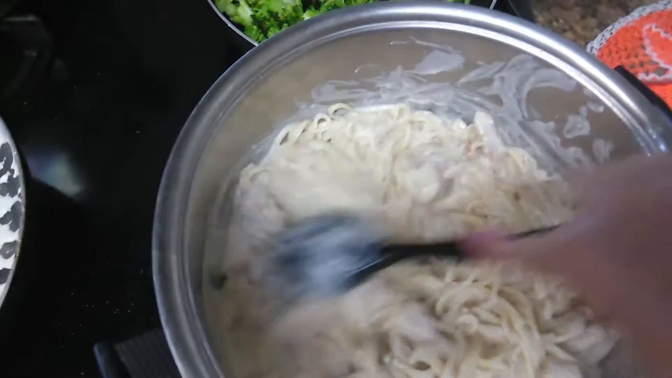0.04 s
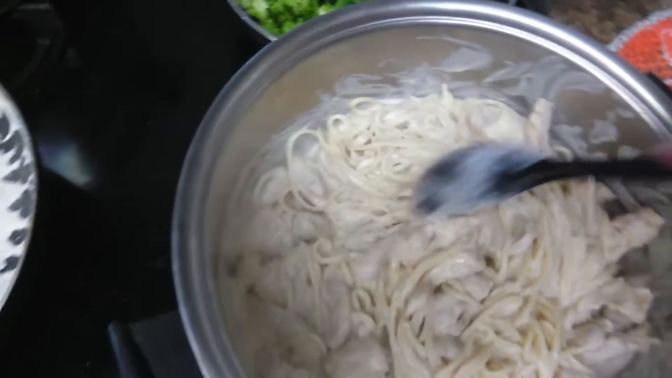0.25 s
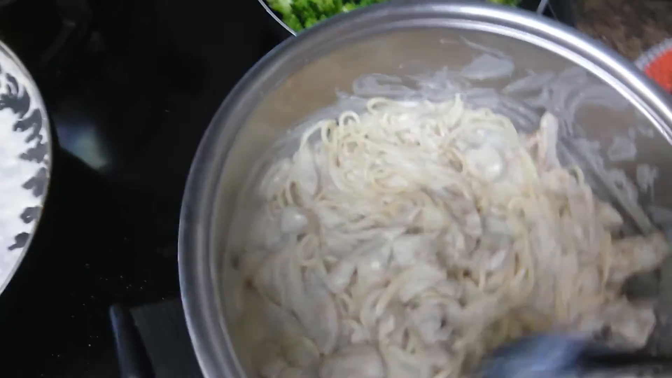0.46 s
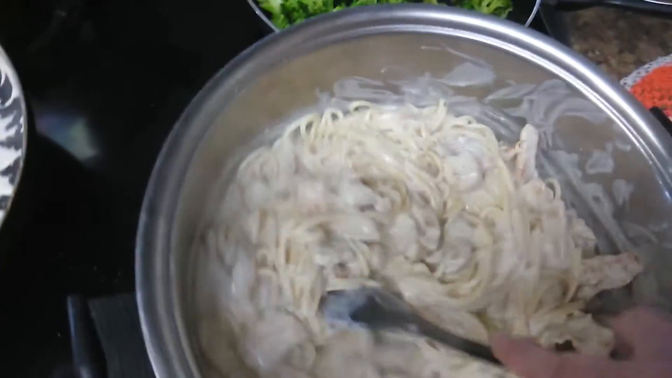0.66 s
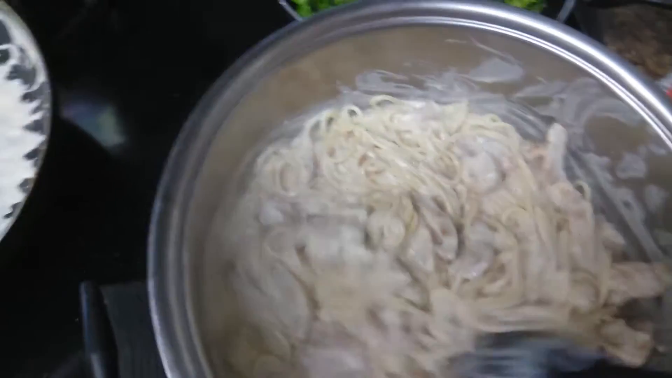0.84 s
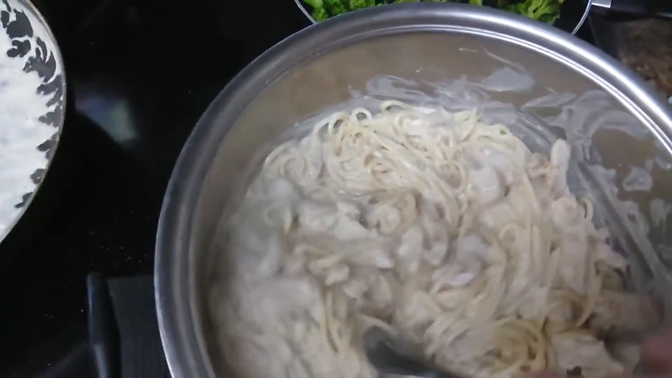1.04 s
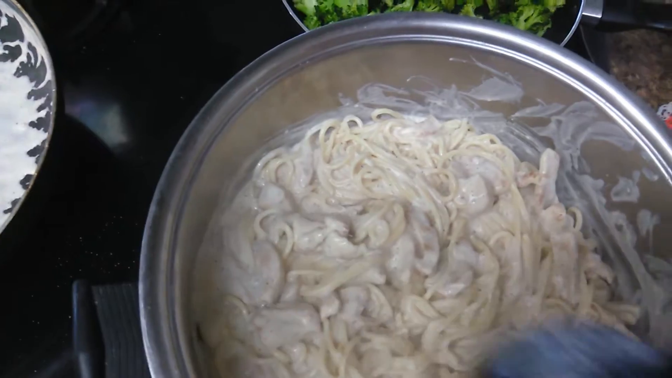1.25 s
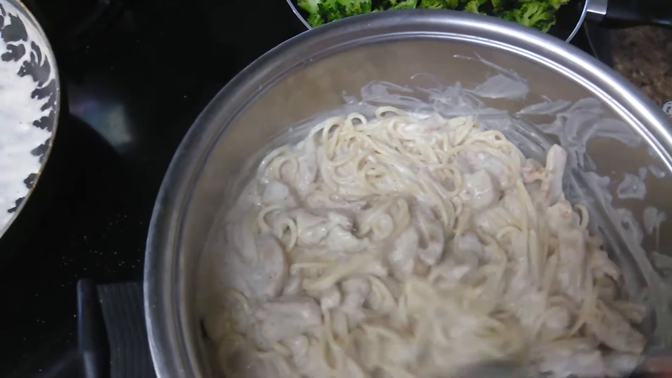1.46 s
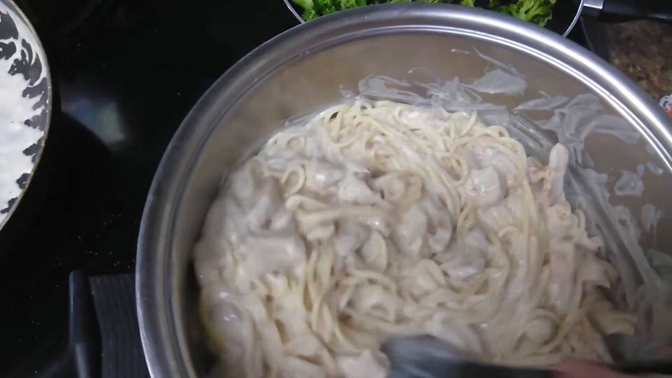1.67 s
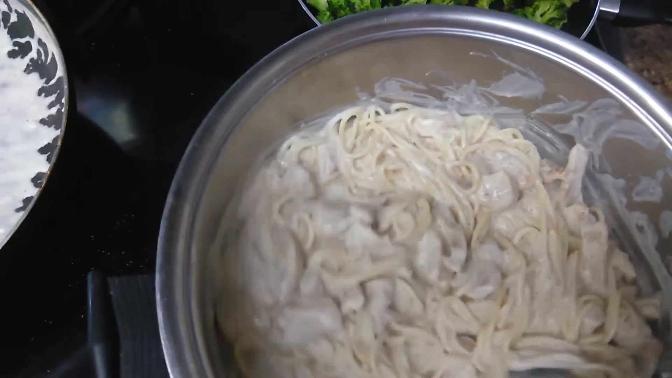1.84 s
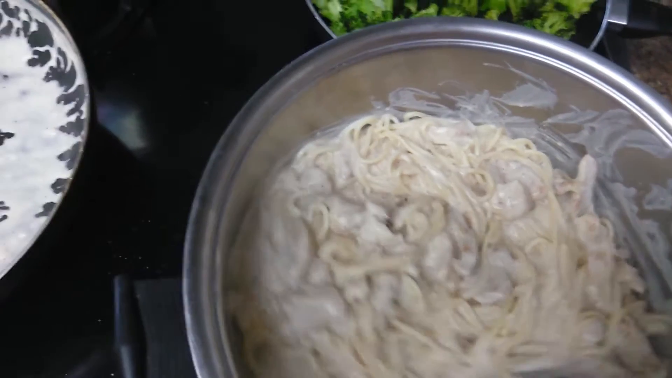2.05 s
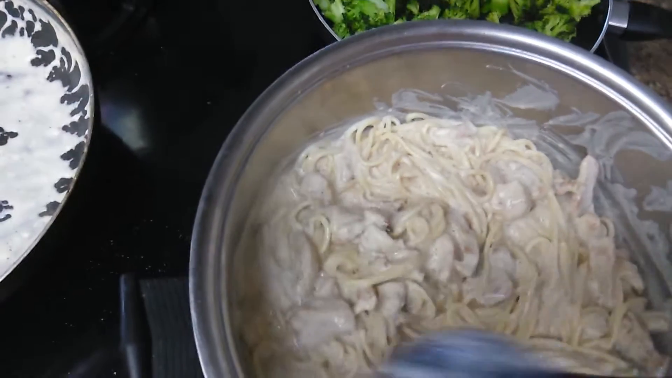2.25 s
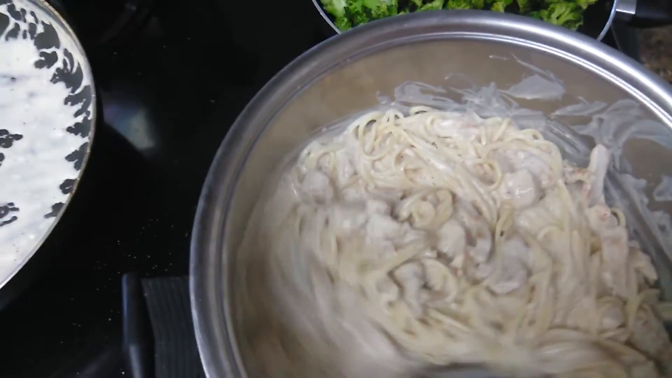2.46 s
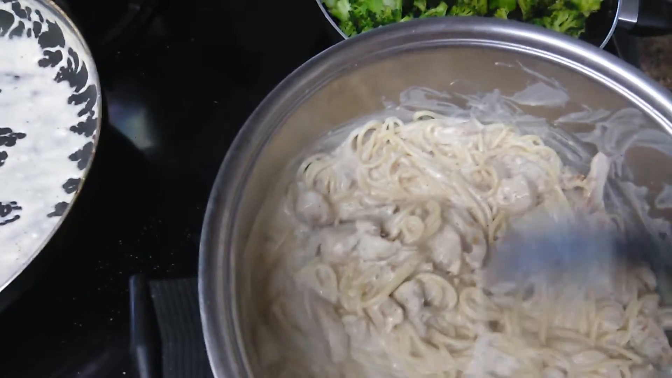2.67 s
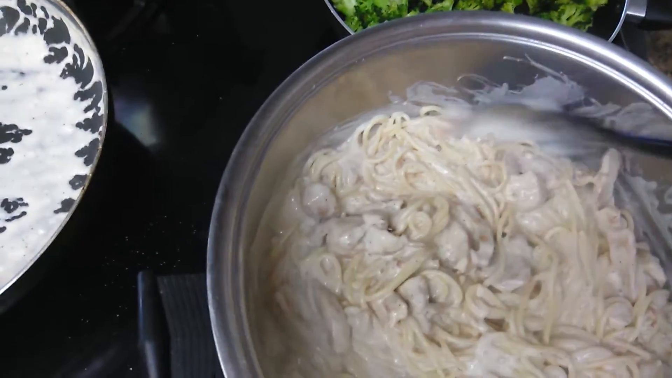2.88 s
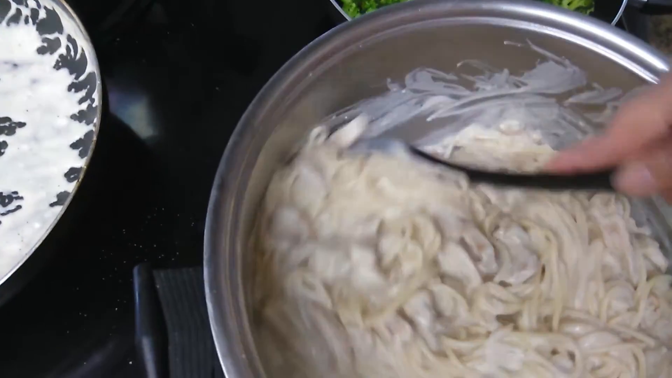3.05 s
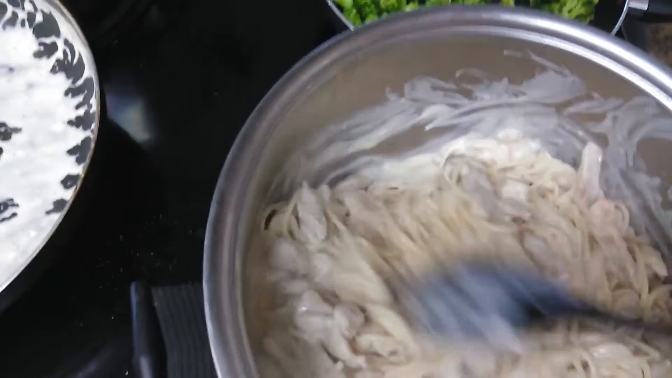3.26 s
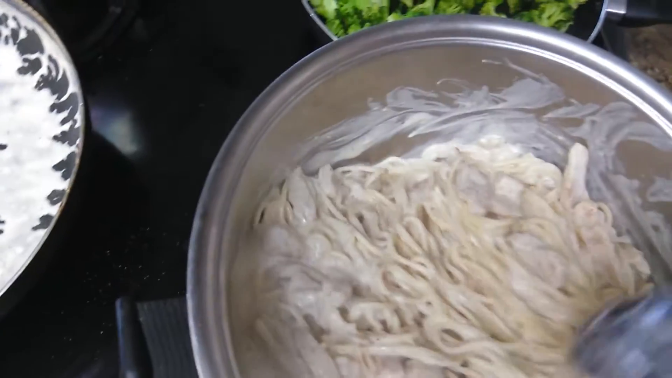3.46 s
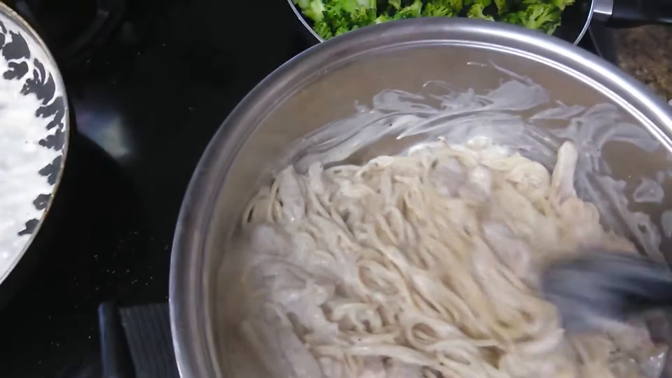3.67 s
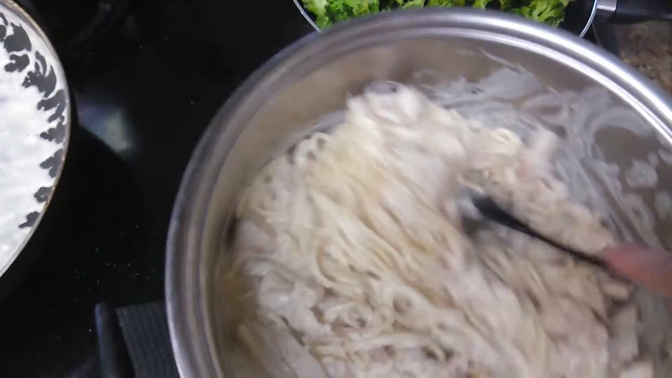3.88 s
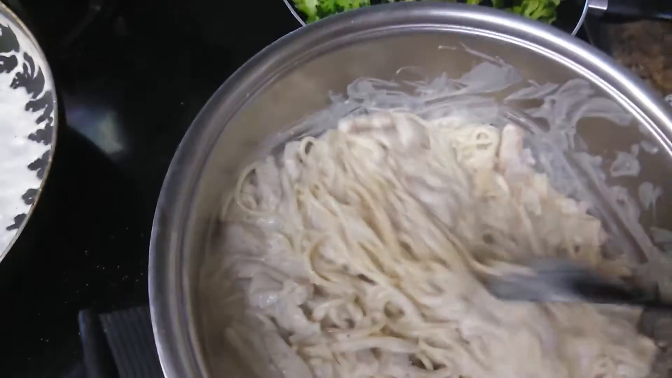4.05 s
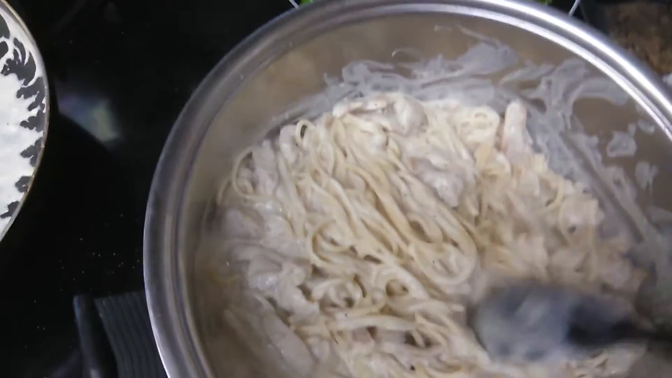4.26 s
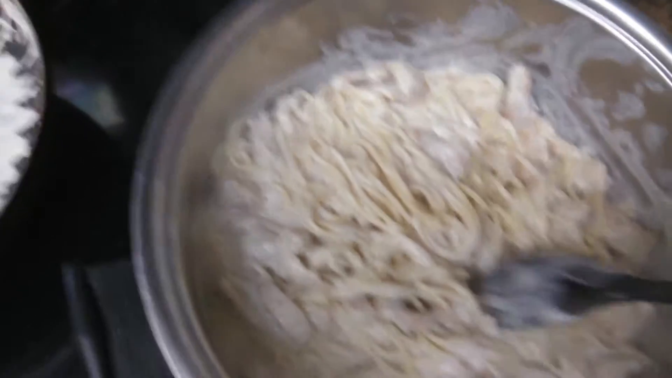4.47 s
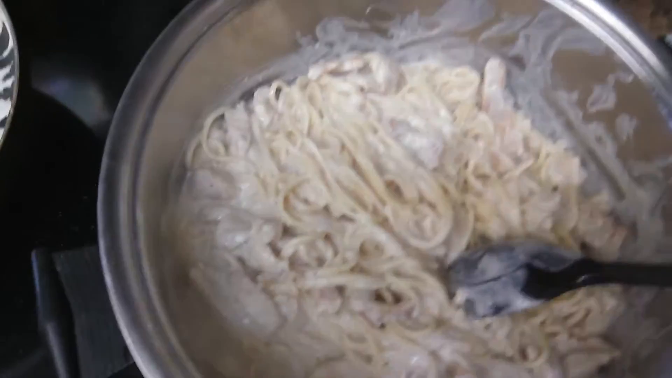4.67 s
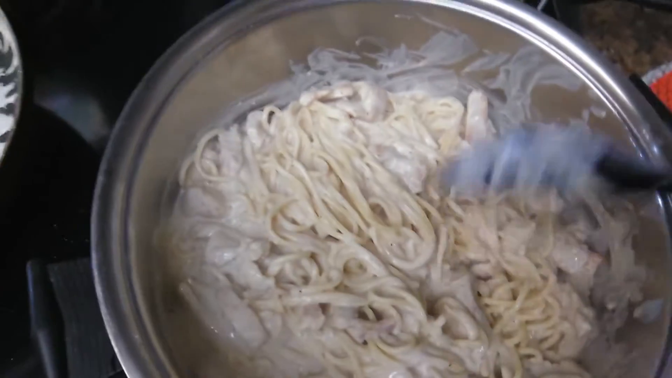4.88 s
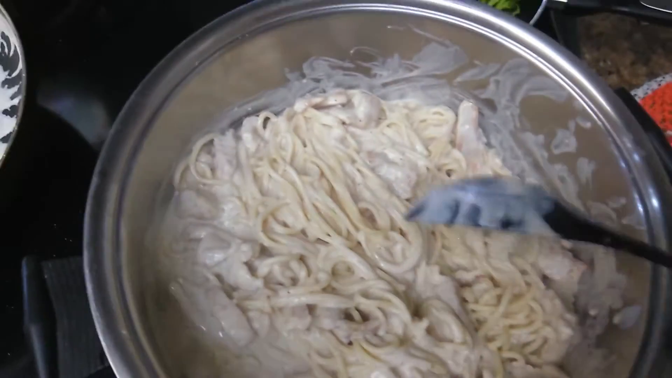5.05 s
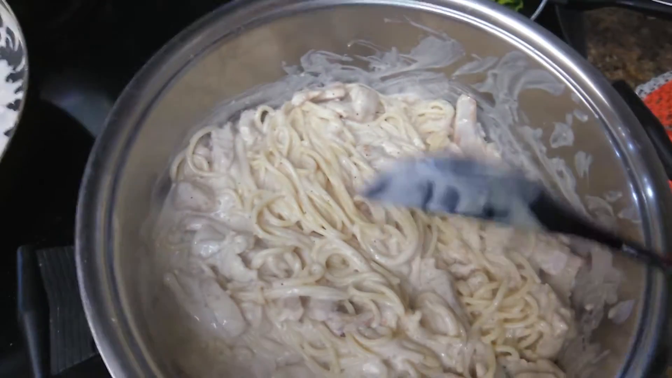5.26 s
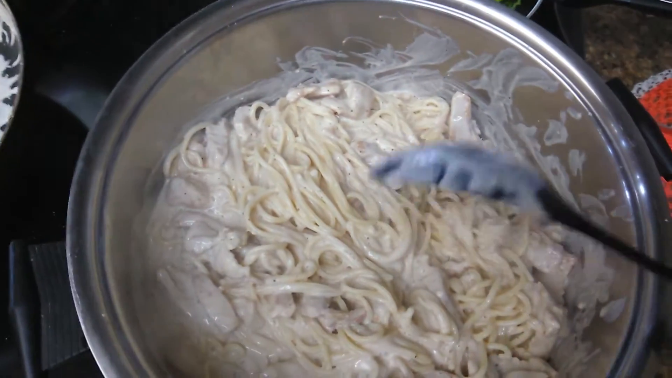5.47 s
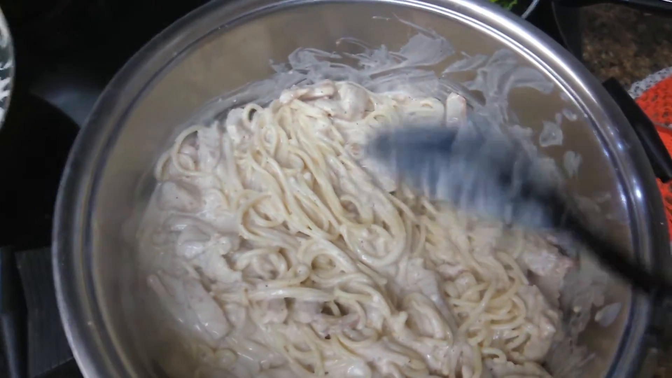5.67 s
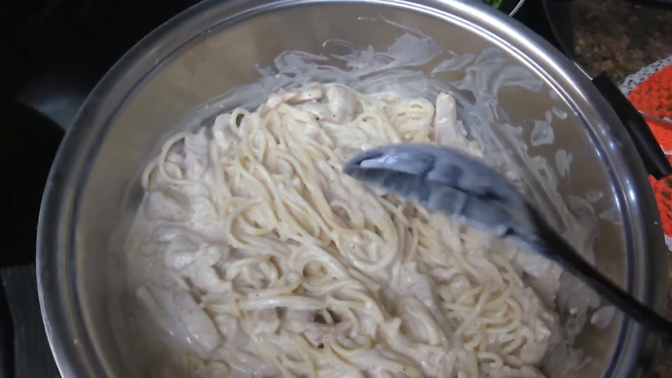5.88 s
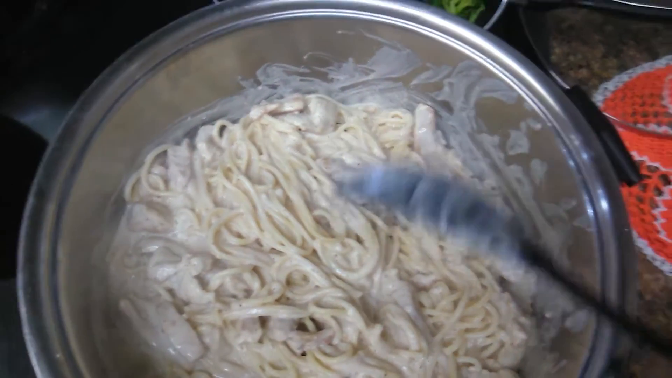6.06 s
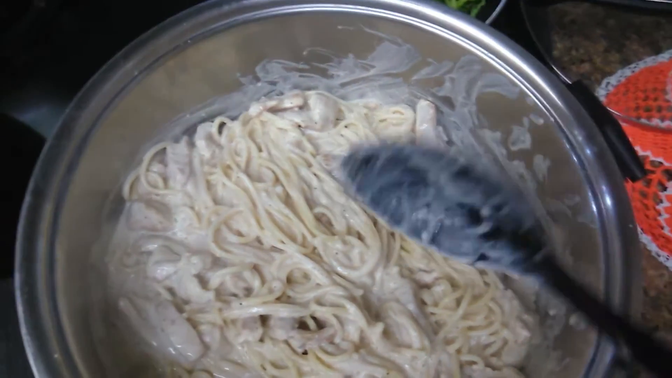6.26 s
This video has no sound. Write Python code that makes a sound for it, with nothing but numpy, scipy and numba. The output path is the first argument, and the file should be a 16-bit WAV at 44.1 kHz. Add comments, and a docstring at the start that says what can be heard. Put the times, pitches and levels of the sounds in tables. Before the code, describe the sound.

Close above a pot in a small, hard-surfaced kitchen, with faint low appliance hum throughout. From 0 to 1.2 seconds a spoon shoves through pasta in thick cream sauce: irregular wet crackle, sticky snaps and tiny popping air pockets. A short lull, then stronger squelches from about 1.45 to 2.15, with the sharpest wet snaps near 1.5 and 2.1. Softer smearing follows until a hard, fairly dull knock on the pot at 2.9, with small clunks and low rumble. Wet stirring resumes from 3.0 to 4.3, lighter and uneven. At 4.35 the spoon raps the steel rim, with weaker taps at 4.55 and 4.75. From 5.05 to the end at about 6.3, seven loud raps come steadily, roughly every 0.2 seconds: bright clattering cracks, short metallic rings damped by the food, deep thumps and brief room echoes.

```python
"""In a small hard kitchen with appliance hum, a plastic spoon turns pasta in thick cream sauce in a steel pot.
The spoon is then rapped on the rim to shake it clean. Bursting air pockets, short gliding sines over wet noise,
make the sauce crackle, snap and pop. Each rap is a noisy crack plus fading sines of spoon, rim and filled pot.
Dull clunks, thumps and a deep rumble follow raps; decaying noise gives the echoes.
A phone held above hears it through two ports of opposite polarity and different colour."""
import sys
import numpy as np
from scipy import signal
from scipy.fft import rfft, irfft, next_fast_len
from scipy.io import wavfile
from scipy.ndimage import uniform_filter1d
from numba import njit

SR = 44100
rng = np.random.default_rng(int(sys.argv[2]) if len(sys.argv) > 2 else 0)


def generate_wav(sig):
    """Save sig (samples, or channels by samples) to the path in sys.argv[1] as 16-bit PCM at SR."""
    pcm = np.round(np.clip(np.atleast_2d(sig).T, -1, 1) * 32767).astype(np.int16)
    wavfile.write(sys.argv[1], SR, pcm)


N = 278697
FAST = next_fast_len(N, True)  # a length that transforms quickly

# Levels are relative, and come before the room and the colour of the ports.
# appliance and air noise: f/Hz, level/dB
HUM_COLOUR = [(18, -57), (30, -20), (60, -1.5), (142, -2), (163, -2.5), (314, -5.5), (443, -11),
              (533, -9.5), (713, -5.5), (814, -11), (1000, -14), (2100, -63.5), (10800, -35.5),
              (16500, -89)]
# how alike left and right noise are: f/Hz, likeness/0-1
LEFT_RIGHT_LIKENESS = [(40, 0.99), (80, 0.73), (200, 0.9), (800, 0.65), (1300, 0), (16000, 0.37)]
HUM_DB = -48
# how long the room echoes: f/Hz, time to fall 60 dB (t60)/s
ROOM_DECAY = [(100, 0.58), (260, 0.7), (700, 1), (1800, 0.61), (4800, 0.51), (9000, 0.47), (12500, 0.32),
              (15000, 0.38)]
# colour of the two phone ports: f/Hz, left minus right level/dB
PORT_COLOUR = [(60, 1.5), (250, 3), (800, 2.5), (1500, 0.5), (4400, -1.5), (7500, -4.5), (9500, 8),
               (12000, 22), (14000, 17.5), (16000, 2)]
TOP_HZ = 16300
CEILING, KNEE = .74, 4  # loudest sample value let through; how sharply loud sound is rounded

# shudder after a blow: f/Hz, level/dB
RUMBLE_COLOUR = [(15, -14), (30, -3.5), (70, 7), (120, -1), (220, -24.5)]
RUMBLE_DB, RUMBLE_S, RUMBLE_ALIKE = -45, 0.035, 0.22  # against the blow; time to its peak; likeness 0-1
# low thumps after a rap, as the jolted pot drops back on the hob: t/s, level/dB
POT_DROPS = [(5.069, -39), (5.467, -27.5), (5.663, -30), (5.853, -38), (6.081, -28)]
# tones of such a thump: f/Hz, level/dB, t60/s
HOB_MODES = [(149.6, 2.5, 0.16), (230, 1.5, 0.075)]
# dull clunks of the pot wall as the heavy food slaps back after a blow: t/s, level/dB, f/Hz
FOOD_SLAPS = [(2.886, -21, 682), (2.94, -27, 660), (3.05, -35, 946), (5.075, -33, 1084), (5.475, -28, 654),
              (5.638, -33, 720), (5.866, -30, 680), (6.262, -33, 740)]
CLUNK_T60_S, CLUNK_SPREAD = 0.076, 0.18  # pitch spread is in log units, up and down

# pushes of the spoon: start t/s, swell time/s, hold time/s, crackle level/dB,
# extra level of large air pockets/dB, extra level of fine ones/dB
SPOON_PUSHES = [(-0.001, 0.12, 0.014, -41, 14, 9), (0.095, 0.018, 0.14, -45.5, -24, -2),
                (0.337, 0.025, 0.055, -52, 0, 8), (0.5, 0.012, 0.21, -45.5, 5, 2.5),
                (0.747, 0.062, 0.12, -45.5, 10, 3), (0.986, 0.0083, 0.029, -40, 10.5, 6),
                (1.117, 0.02, 0.067, -45.5, 9, 1.5), (1.466, 0.014, 0.015, -57, 6, 6),
                (1.531, 0.011, 0.051, -36, 9, 2), (1.681, 0.067, 0.038, -36.5, 10.5, 1.5),
                (1.911, 0.026, 0.024, -43, 9.5, -0.5), (2.048, 0.024, 0.0069, -41.5, 5.5, -1.5),
                (2.365, 0.043, 0.17, -47.5, -3.5, 5.5), (2.95, 0.074, 0.024, -39, 8, 4.5),
                (3.159, 0.014, 0.3, -46, 9, 4.5), (3.644, 0.0061, 0.11, -48.5, 11.5, 3.5),
                (3.751, 0.037, 0.27, -42.5, 8.5, 1.5), (4.156, 0.009, 0.013, -58, 5, 23),
                (4.305, 0.041, 0.012, -35, 13.5, -1), (4.494, 0.021, 0.017, -43.5, -15, 3),
                (4.785, 0.019, 0.085, -58, 2, 10.5)]
START_DB, SETTLE_DB_PER_S = -32.5, 129  # a push swells from this far below its level, then falls quiet
# sound of bursting sauce: f/Hz, level/dB
SAUCE_COLOUR = [(650, -11.5), (1100, -9), (1250, -11), (2400, -6.5), (3960, -2), (9050, -5.5), (11200, -7),
                (14900, -22), (15900, -16.5), (16500, -38)]
LARGE_HZ, FINE_HZ = 2260, 7960  # large pockets sound below the first, fine ones above the second
PATCH_DB, PATCH_PER_S = 3.5, 25  # each half octave of the crackle swells and sinks on its own
# sauce tearing: t/s, level/dB, f/Hz, left minus right level/dB
TEARS = [(0.068, -22.5, 4460, -17), (0.119, -30, 3540, -8), (0.132, -22.5, 10800, -10),
         (0.164, -26, 3600, 1), (0.189, -31, 7320, -13), (0.2662, -28, 11400, -18), (0.325, -27, 5470, -16),
         (0.342, -23.5, 2700, 5), (0.416, -35, 8400, -4), (0.439, -38.5, 11200, 9),
         (0.511, -35.5, 13400, 36), (0.522, -25, 6660, -19.5), (0.529, -28, 10900, 4),
         (0.556, -34, 6500, -6), (0.596, -25, 9500, -6), (0.612, -23.5, 7400, -6), (0.706, -36, 8000, -21),
         (0.772, -34, 5500, -5), (0.793, -22.5, 4370, -12), (0.823, -26, 10400, 9), (0.843, -27, 11700, -3),
         (0.8647, -19.5, 11000, 1), (0.904, -33, 3300, -5), (0.932, -33, 1510, -16),
         (0.998, -22.5, 3600, -6), (1.011, -34.5, 4140, -25), (1.023, -35, 1040, -19),
         (1.1496, -29, 6300, -16), (1.1778, -29, 1260, -7.5), (1.1844, -26, 1600, 1),
         (1.4471, -48, 11100, 52), (1.464, -13.5, 11500, -4), (1.474, -16.5, 1610, 0),
         (1.516, -15.5, 5440, 3), (1.53, -13, 3480, -5), (1.564, -22.5, 3420, -1), (1.604, -27, 4940, -17),
         (1.6243, -25.5, 4270, -10), (1.722, -24, 1266, -7.5), (1.748, -31, 1400, -19),
         (1.796, -20, 3860, -4), (1.843, -23, 4130, 1), (1.876, -37, 2650, -18), (1.913, -24, 10000, 0),
         (1.932, -19.5, 1590, -11), (1.942, -19.5, 10100, 9.5), (1.964, -24.5, 1540, -5),
         (2.059, -31, 5400, 0), (2.063, -28.5, 1340, -2), (2.0803, -18.5, 1480, -7),
         (2.0875, -9.5, 4650, 0), (2.1146, -11.5, 4750, -0.5), (2.161, -44, 5600, 1), (2.25, -47, 5400, -3),
         (2.261, -39, 2000, -5), (2.303, -42, 7640, -11), (2.447, -33, 4800, -20), (2.509, -27, 10800, 7),
         (2.5463, -35, 7200, -17), (2.5594, -30, 2920, 6), (2.6717, -33.5, 6400, -21),
         (2.9996, -29, 3600, -8.5), (3.0235, -17.5, 4140, -1), (3.038, -23, 6800, -1),
         (3.049, -18, 5700, 0), (3.0703, -24, 2770, 8), (3.106, -31.5, 6130, -14), (3.119, -29.5, 7000, -1),
         (3.1908, -35.5, 2700, -10), (3.219, -32.5, 10800, 10), (3.3306, -36, 5140, -22),
         (3.369, -35.5, 11900, -29), (3.422, -24.5, 5300, -1), (3.664, -37, 4600, -7),
         (3.717, -29.5, 1145, -7.5), (3.743, -24.5, 7700, -24.5), (3.8052, -31, 6060, -22.5),
         (3.817, -41, 3580, -6), (3.846, -30.5, 4030, -12), (3.8678, -33.5, 5600, -4.5),
         (3.955, -26, 6300, -12), (4.011, -22, 3600, -1.5), (4.076, -33, 6340, 6.5),
         (4.302, -33, 11160, 11), (4.183, -36, 6200, -26.5), (4.312, -36.5, 2547, -6),
         (4.334, -19.5, 3130, -10.5), (4.345, -31, 3960, -6), (4.94, -48, 5000, -10)]
TEAR_MS = 4.5  # the small pockets of a tear are spread over this time
# crackle round a tear, against its level; how fast it builds before and dies after
SPLASH_DB, BUILD_DB_PER_S, SPLASH_DB_PER_S = -13.5, 1497, 1408
POP_HZ, POP_DB = 1800, -6  # a tear below this pitch is mostly one big pocket; level change of that pocket
POP_CYCLES, POP_VOLLEY_DB = 17, -7  # cycles the big pocket rings; its volley is weaker

# spoon on steel: t/s, blow level/dB, ring level/dB, longest rim mode level/dB, thud level/dB,
# side wall level/dB, spoon clack f/Hz, clack level/dB, brightness/dB per octave,
# middle of the crack level/dB, left minus right level/dB, chatter time/ms
RAPS = [(2.8719, -8, -21, -36, 9.5, 10, 1050, 14, -5.5, 4.5, -1, 7.3),
        (4.3605, -7.5, 1, -0.5, 4.5, 5.5, 1550, 10, -2, -2.5, 1.5, 10.2),
        (4.57, -17.5, -1, -5, 4.5, 5, 1600, 15.5, -3, -4.5, -7, 7.7),
        (4.7273, -25, -4.5, 1.5, 3, -3, 1510, 17.5, -4, -3, -10, 7.9),
        (5.0532, -3.5, -4, 6.5, 6.5, -5, 1480, 15, -2.5, -7, -0.5, 5.5),
        (5.2555, -5, -3.5, 3.5, 6.5, 3.5, 1055, 10, -1.5, -3.5, 0, 7.2),
        (5.451, -4.5, -5.5, 0, 3, 1, 1125, 8.5, -1.5, -3, -0.5, 7.3),
        (5.6197, -2.5, -4.5, -5.5, 1, 2.5, 1040, -16, -1.5, -1, -0.5, 6.7),
        (5.8282, -4.5, 1, 2, 1, 5, 1860, 9.5, -2, 3.5, 0.5, 6.9),
        (6.0413, -1, -2, -1, -2, 2.5, 1886, 2, 0, 0.5, -1.5, 5.8),
        (6.237, -2, -2.5, 2, -1.5, 5, 1860, -1, -1, 4, -1, 6.8)]
# pitches of the rim modes: f/Hz
RIM_HZ = [2955, 3284, 3424, 4385, 4835, 4986, 5655, 5794, 6030, 6772, 7708, 8774, 9882, 11000]
# the same rim modes in turn: level/dB, t60/s
RIM_MODES = [(-8, 0.04), (-9, 0.04), (-8.5, 0.033), (-7.5, 0.055), (-7.5, 0.02), (-9.5, 0.056), (-5, 0.04),
             (5.5, 0.031), (0, 0.049), (4.5, 0.038), (0.5, 0.096), (-5.5, 0.059), (-5, 0.035), (-8, 0.043)]
# a round rim splits every mode into a close pair that beats: typical gap, level of the twin
TWIN_HZ, TWIN_DB = 40.9, -25.5
TWIN_T60_S = .3  # the twin meets the food less and hangs on
# food-damped pot body: f/Hz, level/dB, t60/s
BODY_MODES = [(139, -1, 0.13), (237, 3, 0.11), (362.4, -7.5, 0.16), (520, -1.5, 0.07), (681.4, -1.5, 0.11),
              (785.7, -7, 0.23), (933, -12, 0.27), (1051, 6, 0.032), (1480, 2, 0.027), (1830, 1, 0.0093)]
WALL_HZ = 500, 950  # body modes that a blow on the side wall favours
JUDDER_S, JUDDER_DB_PER_S = 0.044, 152  # small rebounds strike the body within this time, ever weaker
BODY_LAG = 7  # samples by which the left port hears the body later
CLACK_DB, CLACK_T60_S = -19, 0.026
# colour of the crack: f/Hz, level/dB
CRACK_COLOUR = [(100, -28), (350, -18), (700, -19.5), (1500, -17.5), (2130, -17.5), (2900, -9.5),
                (3500, -4), (4100, -8.5), (4900, -2), (5740, -3.5), (6350, -7.5), (6780, 2.5), (7400, -26),
                (7750, -14.5), (8330, -13), (8800, -8), (9330, -18), (9880, -8.5), (10300, -12),
                (11500, -14.5), (15400, -40), (16500, -63)]
MIDDLE_HZ = 2250, 4100  # band of the crack that changes most with the spot that is struck
# the rim carves valleys in this band, unless the blow leaves it muted at or below this ring level
VALLEYS_HZ, MUTED_DB = (7000, 10600), -15
RIPPLE_DB = 1.8


def undb(db):
    """Turn decibels into a factor."""
    return 10 ** (np.asarray(db) / 20)


def unit(x):
    """Scale to an average (rms) strength of 1."""
    return x / np.sqrt(np.mean(x ** 2))


def on_log(table, hz):
    """Read (Hz, value) points on a log-frequency axis."""
    at, value = np.transpose(table)
    return np.interp(np.log(np.maximum(hz, 1)), np.log(at), value)


def bins(size):
    """Frequencies in Hz of a spectrum."""
    return np.fft.rfftfreq(size, 1 / SR)


def colour(x, table, size, extra_db=0.):
    """Weight the spectrum of x by (Hz, dB) points."""
    weight = undb(on_log(table, bins(size)) + extra_db)
    return irfft(rfft(x, size) * weight, size)[..., :x.shape[-1]]


def walk(rate):
    """Random levels, a new one every 1 / rate s, joined by ramps; spread a little below 1."""
    k = int(SR / rate)
    levels = np.repeat(rng.standard_normal(N // k + 1), k)
    return uniform_filter1d(levels, k)[:N]


def pair(size, alike):
    """Spectra of two noises that share the part alike of their sound, bin by bin."""
    mid, side = rfft(rng.standard_normal((2, size)))
    alike = np.clip(alike, 0, 1)
    shared, own = mid * np.sqrt(1 + alike), side * np.sqrt(1 - alike)
    return np.array([shared + own, shared - own])


@njit
def rings(start, hz, t60, size, glide, swell, lag, pan, count):
    """Damped sines that swell in, each reaching the left port at its own lag and level."""
    out = np.zeros((2, count + 64))
    for k in range(len(start)):
        # one complex step per sample turns and shrinks z
        step = np.exp(2j * np.pi * hz[k] / SR - np.log(1000) / (t60[k] * SR))
        bend = np.exp(2j * np.pi * hz[k] * glide[k] / SR)
        z = size[k] + 0j
        for i in range(min(int(t60[k] * SR), count - start[k])):
            v = z.imag * min(1., i * hz[k] / (swell * SR))
            out[0, start[k] + lag[k] + i] += v * pan[k]
            out[1, start[k] + i] += v / pan[k]
            z *= step
            step *= bend
    return out[:, :count]


def play(s, hz, t60, db, lag, pan_db, rise=0., swell=1.5):
    """Sines that swell for some cycles and whose pitch climbs by the share rise over their life."""
    hz = np.clip(hz, 30, .4 * SR)
    start, lag = (s * SR).astype(np.int64), lag.astype(np.int64)
    glide = rise / (t60 * SR)
    return rings(start, hz, t60, undb(db), glide, max(swell, .1), lag, undb(pan_db / 2), count=N)


def hum():
    """Appliances and air: coloured noise whose level wavers a little."""
    hz = bins(FAST)
    spectra = pair(FAST, on_log(LEFT_RIGHT_LIKENESS, hz)) * undb(on_log(HUM_COLOUR, hz))
    noise = irfft(spectra, FAST)[:, :N]
    return unit(noise) * undb(HUM_DB + 0.79 * walk(1.1))


def kitchen(x, wet_db=-37, gap_ms=1.4):
    """Diffuse echoes: half-octave noise bands, each dying at its own pace."""
    size = 40000
    t, hz = np.arange(size) / SR, bins(size)
    noise, tail = pair(size, on_log(LEFT_RIGHT_LIKENESS, hz)), 0
    for centre in 70 * 2 ** np.arange(0, 8.1, .5):
        octaves_off = np.log2(hz / centre + 1e-9)
        band = np.cos(np.pi * np.clip(octaves_off, -.5, .5)) ** 2
        decay = undb(-60 * t / on_log(ROOM_DECAY, centre))
        tail = tail + irfft(noise * band, size) * decay
    tail = tail * np.clip(1000 * t / gap_ms, 0, 1) ** 2  # the echoes build up softly
    return undb(wet_db) * signal.fftconvolve(x[None], tail, axes=1)[:, :N]


def rumble():
    """A deep shudder of low noise that swells and fades after every blow."""
    hz, t = bins(FAST), np.arange(N) / SR
    spectra = pair(FAST, RUMBLE_ALIKE) * undb(on_log(RUMBLE_COLOUR, hz))
    noise = unit(irfft(spectra, FAST)[:, :N])
    strength = 0
    for s, blow_db, *_ in RAPS:
        late = np.clip(t - s, 0, None) / RUMBLE_S
        strength = strength + undb(blow_db + RUMBLE_DB) * late * np.exp(1 - late)
    return noise * strength


def rocks(wander_db=2.5):
    """Soft, dull thumps of pot and hob: low damped sines."""
    chance = rng.standard_normal((len(POT_DROPS), len(HOB_MODES), 2))
    rows = [(s, f * (1 + 0.028 * a), t60, db + d + wander_db * b, 0, 4.5)
            for (s, db), draws in zip(POT_DROPS, chance)
            for (f, d, t60), (a, b) in zip(HOB_MODES, draws)]
    return play(*np.transpose(rows), swell=2.5)


def clunks(count=4):
    """Each clunk is a small cluster of close, dull modes of the pot wall."""
    chance = rng.random((len(FOOD_SLAPS), count, 3))
    rows = [(s + 0.00734 * c, f * np.exp(CLUNK_SPREAD * 2 * (a - .5)), CLUNK_T60_S, db - 6 * b, BODY_LAG, -2)
            for (s, db, f), draws in zip(FOOD_SLAPS, chance)
            for a, b, c in draws]
    return play(*np.transpose(rows), swell=0.99)


def stir():
    """Crackle level and extra dB of large and fine pockets: pushes swell, hold and settle; tears splash."""
    t = np.arange(0, N / SR + .01, .001)
    start, swell, hold, db, large_db, fine_db = np.transpose(SPOON_PUSHES)[:, :, None]
    swell = np.maximum(swell, .003)
    rise = np.clip((t - start) / swell, 0, 1)
    settling_s = np.clip(t - start - swell - hold, 0, None)
    shape_db = db + START_DB * (1 - rise) - SETTLE_DB_PER_S * settling_s
    pushes = undb(2 * shape_db) * (t > start) + 1e-12  # doubled dB give power, which adds up
    s, tear_db = np.transpose(TEARS)[:2, :, None]
    slope = np.where(t > s, SPLASH_DB_PER_S, BUILD_DB_PER_S)
    splash = undb(2 * (tear_db + SPLASH_DB - slope * np.abs(t - s))).sum(axis=0)
    total = pushes.sum(axis=0)
    share = pushes / total
    columns = 10 * np.log10(total + splash), (share * large_db).sum(axis=0), (share * fine_db).sum(axis=0)
    return [np.interp(np.arange(N) / SR, t, c) for c in columns]


def wet_smear(patch_db, large_db, fine_db):
    """Steady sauce-coloured noise whose half octaves and ends follow the given levels."""
    shared, own = rng.standard_normal((2, N))
    smear = np.array([np.roll(shared, shift=22), shared + 2.0 * own])
    smear = unit(colour(smear, SAUCE_COLOUR, FAST))
    spectrum = rfft(smear, FAST)
    step = np.clip(2 * np.log2(bins(FAST) / 1000 + 1e-9), 0, 8)  # half octaves above 1 kHz
    smear = 0
    for k, level_db in enumerate(patch_db):
        band = np.clip(1 - np.abs(step - k), 0, 1)
        smear = smear + irfft(spectrum * band, FAST)[:, :N] * undb(level_db)
    low = signal.sosfilt(signal.butter(4, LARGE_HZ, "low", fs=SR, output="sos"), smear)
    high = signal.sosfilt(signal.butter(4, FINE_HZ, "high", fs=SR, output="sos"), smear)
    return smear + (undb(large_db) - 1) * low + (undb(fine_db) - 1) * high


def crackle(scatter_db=3.5, cycles=11.0, grain_db=4, smear_db=-7.5, least_ms=1.4, bunch_db=1.0):
    """Tiny air pockets burst in bunches while the spoon shears the sauce; a wet smear lies under them."""
    level_db, large_db, fine_db = stir()
    effort_db = level_db + 3.5 * walk(160) + bunch_db * walk(45)
    when, pitch, size, life, lag, pan = rng.random((9000, 6)).T
    when, hz = 5.04 * when, 1000 * 16 ** pitch
    at = (when * SR).astype(int)
    # small pockets are high and brief, so they need more size for the same energy
    db = on_log(SAUCE_COLOUR, hz) + 13 * np.log10(hz / 5000)
    db = db - scatter_db * np.log(size + 0.046) + effort_db[at]
    db = db + (hz < LARGE_HZ) * large_db[at] + (hz > FINE_HZ) * fine_db[at]
    patch_db = PATCH_DB * np.array([walk(PATCH_PER_S) for _ in range(9)])
    db = db + patch_db[np.rint(8 * pitch).astype(int), at]
    t60 = least_ms / 1000 + cycles * (0.2 + 0.77 * life) / hz
    pockets = play(when, hz, t60, db + grain_db - 3.0, 6 + 24 * lag, 6 * (pan - .5), rise=0.17, swell=0.57)
    smear = wet_smear(patch_db, large_db, fine_db)
    return pockets + smear * undb(effort_db + smear_db)


def snaps(count=12, cycles=11, rest_db=-12, lead_db=8, lead_cycles=10):
    """Each tear is one pocket at its pitch among a volley of smaller ones that dies away."""
    s, db, hz, pan = np.transpose(TEARS)[:, :, None]
    chance = rng.random((len(TEARS), count + 1, 3))
    lag = 6 + 24 * chance[:, :1, 0] + np.zeros(count)
    when, pitch, size = np.moveaxis(chance[:, 1:], 2, 0)
    first = np.arange(count) == 0
    late = np.where(first, 0, when - .2)  # some small pockets burst just before the main one
    pop = hz < POP_HZ
    db = db + pop * np.where(first, POP_DB, POP_VOLLEY_DB)
    cycles = np.where(first, np.where(pop, POP_CYCLES, lead_cycles), cycles)
    # the volley leans towards 6 kHz and scatters in pitch
    hz = np.where(first, hz, hz * (6000 / hz) ** .25 * np.exp(1.1 * (pitch - .5)))
    db = db + lead_db + np.where(first, 0, rest_db - 9 * np.abs(late) + 6 * size)
    rows = [s + late * TEAR_MS / 1000, hz, cycles / hz, db, lag, pan + 0 * lag]
    return play(*(r.ravel() for r in rows), rise=0.13, swell=2.5)


def rim_modes(s, level_db, ring_db, bell_db, pan, wander, wander_db):
    """High, beating pairs of the rim; every blow lands elsewhere and shares its energy out afresh."""
    rows = []
    longest = max(RIM_MODES, key=lambda mode: mode[1])
    for f, mode, (a, b) in zip(RIM_HZ, RIM_MODES, wander):
        extra_db = bell_db if mode is longest else ring_db + wander_db * b
        for twin in (False, True):
            hz = f + 8 * a + twin * TWIN_HZ * b
            t60 = TWIN_T60_S if twin and mode is not longest else mode[1]
            rows.append((s, hz, t60, level_db + mode[0] + twin * TWIN_DB + extra_db, 13, pan))
    return rows


def body_modes(s, level_db, thud_db, wall_db, pan, rebounds):
    """Dull modes of the filled pot, struck once and then again by weaker rebounds."""
    rows = []
    for k, draws in enumerate(rebounds):
        for (f, d, t60), (a, b, c) in zip(BODY_MODES, draws):
            late = JUDDER_S * c * (k > 0)
            spot_db = wall_db if WALL_HZ[0] < f < WALL_HZ[1] else thud_db
            db = level_db + spot_db + d + 6 * (b - .5) - JUDDER_DB_PER_S * late
            rows.append((s + late, f * (1 + 0.14 * (a - .5)), t60, db, BODY_LAG, pan))
    return rows


def knocks(ring_db=-10, thud_db=-26, wander_db=3.0, far_db=13, rough_db=2.16, rim_far_db=-12,
           body_far_db=-19, fall=1.0, rise_ms=0.6, count=3):
    """A rattling crack, the spoon's clack, rim and filled body; near, and as the walls get it."""
    near, far, t = np.zeros((2, N + 4096)), np.zeros(N + 4096), np.arange(4096) / SR
    rim, pot = [], []
    octaves = np.log2(bins(size=4128) / 5000 + .05)
    click = signal.unit_impulse(4128, 128)
    for s, db, ring, bell, thud, wall, clack_hz, clack, tilt, middle, pan, crack_ms in RAPS:
        body = [(f, d + middle * (MIDDLE_HZ[0] < f < MIDDLE_HZ[1])) for f, d in CRACK_COLOUR
                if ring > MUTED_DB or not VALLEYS_HZ[0] < f < VALLEYS_HZ[1]]
        # countless small modes, a few hundred Hz apart, take the blow unevenly
        ripple = np.interp(np.arange(len(octaves)) / 16, np.arange(130), rng.standard_normal(size=130))
        uneven_db = tilt * octaves + RIPPLE_DB * ripple
        noise, wander = rng.standard_normal(4128), rng.standard_normal((len(RIM_MODES), 2))
        rebounds = rng.random((count, len(BODY_MODES), 3))
        lag, at = rng.integers(8, 22), int(s * SR)
        # the rim chatters in uneven bursts for a moment before it settles
        bursts = undb(rough_db * np.repeat(rng.standard_normal(size=128), repeats=32))
        shape = np.exp(-(1000 * t / crack_ms) ** fall) * np.clip(1000 * t / rise_ms, 0, 1) * bursts
        crack = unit(colour(noise, body, len(noise), uneven_db))
        crack = np.array([crack[:4096], crack[lag:lag + 4096]])
        near[:, at:at + 4096] += undb(db - 4.0 + np.array([[pan], [-pan]]) / 2) * shape * crack
        # summed over all directions the crack is one even click
        even = colour(click, body, len(click), uneven_db)[:4096]
        far[at:at + 4096] += undb(db + far_db) * even / np.linalg.norm(even)
        rim += rim_modes(s, db + ring_db, ring, bell, pan, wander, wander_db)
        pot.append((s, clack_hz, CLACK_T60_S, db + CLACK_DB + clack, BODY_LAG, pan))
        pot += body_modes(s, db + thud_db, thud, wall, pan, rebounds)
    rim, pot = play(*np.transpose(rim), swell=3.4), play(*np.transpose(pot), swell=3.76)
    far = far[:N] + undb(rim_far_db) * rim[1] + undb(body_far_db) * pot[1]
    return near[:, :N] + rim + pot, far


def scene(shielded_db=-11):
    """Add up all sources; sauce and raps also feed the room."""
    sauce = crackle() + snaps()
    near, far = knocks()
    # the pot walls keep part of the sauce sound from the room
    echoes = kitchen(far + undb(shielded_db) * sauce[1])
    return hum() + echoes + rumble() + rocks() + clunks() + sauce + near


def record(dry):
    """Two ports of different colour, the right upside down; loud sound is rounded and the top is cut."""
    half = np.array(PORT_COLOUR) * [1, .5]
    left = colour(dry[0], half, FAST)
    right = -colour(dry[1], half * [1, -1], FAST)
    ports = np.array([left, right])
    rounded = ports / (1 + np.abs(ports / CEILING) ** KNEE) ** (1 / KNEE)
    return signal.sosfilt(signal.ellip(8, .2, 70, TOP_HZ, fs=SR, output="sos"), rounded)


dry = scene()
out = record(dry)
generate_wav(out)
```